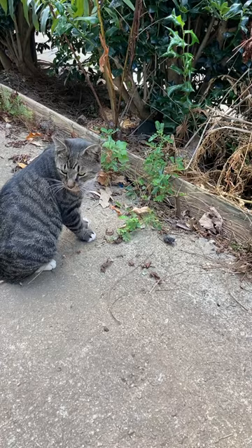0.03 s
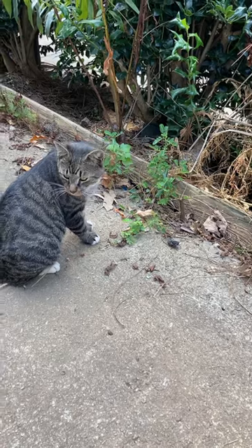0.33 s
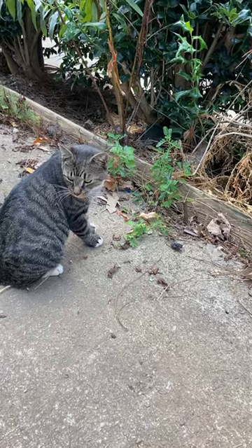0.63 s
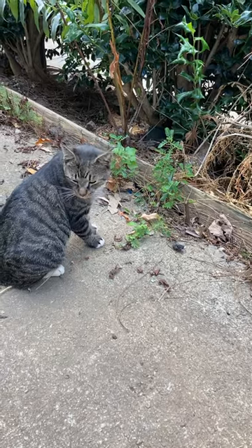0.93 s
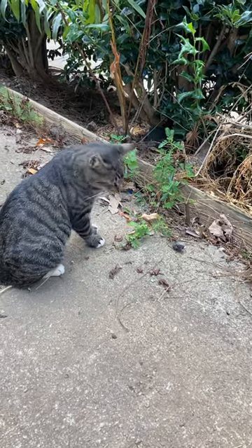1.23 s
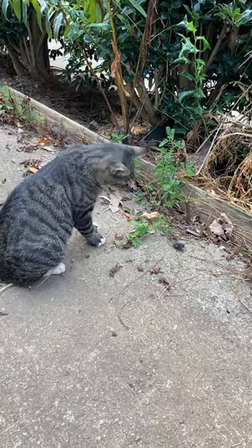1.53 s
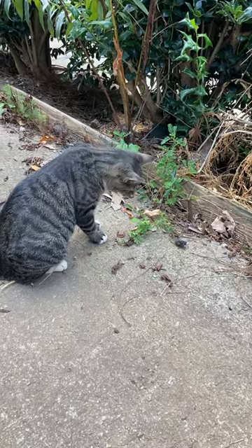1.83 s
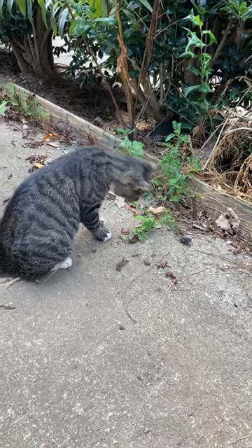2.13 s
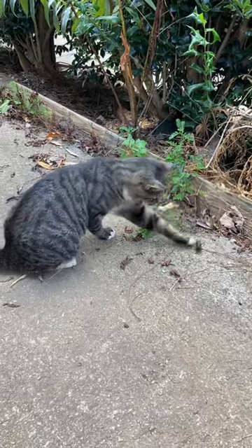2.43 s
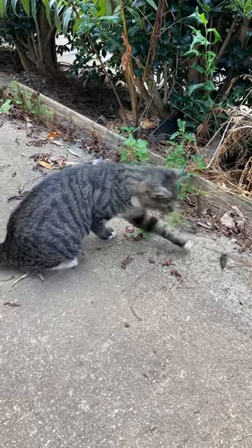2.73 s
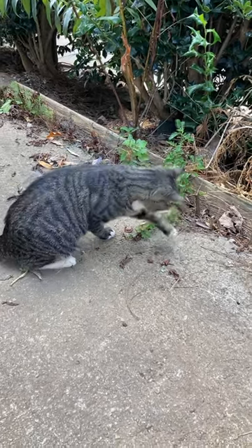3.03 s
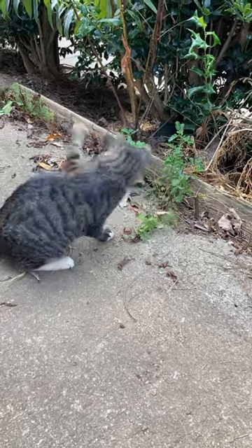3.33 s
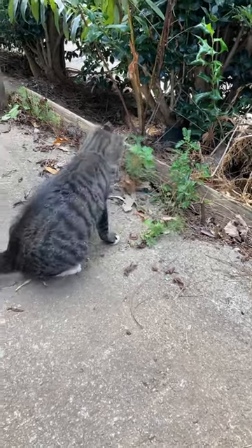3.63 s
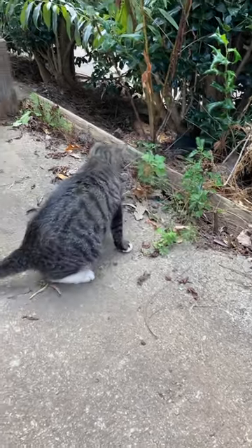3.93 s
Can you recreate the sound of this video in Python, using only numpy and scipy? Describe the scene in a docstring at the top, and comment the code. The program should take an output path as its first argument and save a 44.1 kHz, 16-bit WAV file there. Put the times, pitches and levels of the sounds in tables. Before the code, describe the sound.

Harsh, shrill cicada buzzing breaks out in bursts, with light scuffs and distant traffic rumble.

```python
"""Far traffic rumbles throughout, under faint insects; an engine drones and fades, a car swells by at 1.5 s.
From 2.2 s a cat paws at a cicada on a concrete path; from 2.35 s the cicada screeches in three bursts.
Its two tymbals take turns, three ribs buckling per stroke; the clicks ring its hollow abdomen and blur
as it tumbles. Garden walls add a short tail. Last chirps and scuffs come near 3.8 s.
Heard through two closely spaced microphone ports."""
import sys
import numpy as np
from scipy import signal
from scipy.fft import rfft, irfft
from scipy.io import wavfile
from scipy.ndimage import uniform_filter1d

SR = 44100
rng = np.random.default_rng(int(sys.argv[2]) if len(sys.argv) > 2 else 0)


def unload_audio(sound):
    """Save the sound as a 16-bit wav file, at the path given as the first command line argument."""
    columns = np.transpose(np.atleast_2d(sound))
    # keep every value between -1 and 1, then stretch to whole-number steps
    steps = np.round(np.clip(columns, -1, 1) * 32767)
    wavfile.write(sys.argv[1], SR, steps.astype(np.int16))


N = 176400
T = np.arange(N) / SR
HZ = np.maximum(np.arange(N // 2 + 1) * SR / N, 1)


# screech envelopes: t/s, level/dB
SCREECH_1 = [(2.346, -24.5), (2.4, -24), (2.445, -14.5), (2.5, -18), (2.56, -22), (2.615, -29.5),
             (2.632, -24), (2.652, -20), (2.79, -16.5), (2.815, -22), (2.9, -23), (2.972, -24.5)]
SCREECH_2 = [(3.056, -22.5), (3.068, -18.5), (3.085, -21.8), (3.165, -21), (3.205, -26), (3.248, -30)]
SCREECH_3 = [(3.332, -28.5), (3.362, -25.5), (3.42, -30), (3.47, -30), (3.55, -26.5), (3.585, -30.5),
             (3.615, -25.5), (3.672, -24.5)]
# single twitches: t/s, half length/s, level/dB
CHIRPS = [(2.332, 0.009, -46), (2.418, 0.0043, -19), (3.28, 0.0053, -31), (3.767, 0.0033, -32.5),
          (3.814, 0.0066, -45)]

def cicada(attack_s=0.0088, release_s=0.0093):
    """The body's buzz, levelled, then gated into abrupt screeches and chirps."""
    screeches = 0
    for rows in (SCREECH_1, SCREECH_2, SCREECH_3):
        attack = np.clip(1 + (T - rows[0][0]) / attack_s, 0, 1)
        release = np.exp(-np.maximum(T - rows[-1][0], 0) / release_s)
        screeches += attack * release * undb(curve(rows))
    chirp_power = sum(undb(db) ** 2 * np.exp(-((T - t) / half_s) ** 2) for t, half_s, db in CHIRPS)
    envelope = np.sqrt(screeches ** 2 + chirp_power)
    buzz = body()
    return envelope * buzz / np.sqrt(uniform_filter1d(buzz ** 2, size=600))


# body response: f/Hz, gain/dB
BODY_RESPONSE = [(1500, -61), (2600, -25.5), (3300, -10), (4000, -6.5), (4700, -1.5), (5700, -2.5),
                 (6700, -4.5), (7700, -8.5), (8500, -4), (9500, -6), (11500, -9), (13500, -9.5),
                 (15600, -18)]
# colour by posture: t/s, abdomen ring/dB, abdomen f/Hz, treble/dB, low buzz/dB, click blur/dB
POSTURE = [(2.35, -10, 6700, -0.5, -1.5, -8), (2.40, -1, 6400, -0.5, 1.5, -9),
           (2.445, 13.5, 5670, -4.5, 2.5, 0), (2.60, 9, 5250, 6, 6.5, 8.5),
           (2.655, -7, 5740, -1.5, -5, -14), (2.79, 7.5, 5700, -3, -9, -12),
           (2.86, -2, 5440, -2.5, -9.5, -10), (2.95, 8.5, 5270, -1, 3.5, -6),
           (3.07, 17.5, 5850, 3, -1.5, -9), (3.17, 14.5, 5330, 2.5, 5.5, -6), (3.35, 1.5, 5760, -1, -3, -2),
           (3.52, -3, 5700, 1.5, 1, -6), (3.66, -3, 5660, -3, -1, 1)]

def body(treble_hz=7600, low_hz=4900):
    """Tymbal clicks pass through the body, whose colour follows posture."""
    ring_db, ring_hz, treble_db, low_db, blur_db = (curve(POSTURE, i) for i in range(1, 6))
    buzz = filtered(tymbals(blur_db), minimum_phase(BODY_RESPONSE))
    treble = filtered(buzz, 1 / (1 + (treble_hz / HZ) ** 20))
    low = filtered(buzz, 1 / (1 + (HZ / low_hz) ** 20))
    buzz += (undb(treble_db) - 1) * treble + (undb(low_db) - 1) * low
    return buzz + undb(ring_db) * abdomen(buzz, ring_hz)


# rib buckling: t/s, rate/Hz
BUCKLE_RATE = [(2.48, 556), (2.76, 558), (2.88, 543), (2.97, 522), (3.16, 530), (3.45, 588)]
# ribs of one stroke: relative level/dB, ring f/Hz
RIBS = [(-3, 7100), (-3.5, 8140), (-5.5, 6200)]

def tymbals(blur_db, count=2400, jitter_s=0.0001, scatter_db=2.4, weak_side_db=-0.5,
            ring_db=6, width_hz=1040):
    """Two tymbals buckle in turn, rib by rib; each rib rings briefly and a rasp blurs the clicks."""
    jitter, scatter = rng.standard_normal((count, 2)).T
    k = np.arange(count)
    buckled = np.cumsum(curve(BUCKLE_RATE)) / SR
    times_s = np.interp(k, buckled, T) + jitter_s * jitter
    side = k // len(RIBS) % 2
    sizes = undb(scatter_db * scatter + weak_side_db * side) * (k < buckled[-1])
    strokes = 0
    for i, (db, hz) in enumerate(RIBS):
        rib = clicks(times_s[i::len(RIBS)], sizes[i::len(RIBS)])
        strokes += undb(db) * filtered(rib, 1 + undb(ring_db) * resonance(hz, width_hz))
    rasp = rng.standard_normal(N) * undb(0.83 * wander(463))
    return unit(strokes) + undb(blur_db) * unit(rasp)


def abdomen(x, ring_hz, width_hz=360):
    """The air cavity rings at a pitch that moves as the insect is squeezed and stretches."""
    pitch_hz = ring_hz * (1 + 0.025 * wander(25))
    carrier = np.exp(2j * np.pi * np.cumsum(pitch_hz) / SR)
    pole = np.exp(-np.pi * width_hz / SR)
    return 2 * np.real(carrier * signal.lfilter([1 - pole], [1, -pole], x / carrier))


# phase lead of the left port: f/Hz, phase/rad
PORT_PHASE = [(20, 0), (2300, 1.5), (3300, 1.5), (4000, 1.85), (4700, 2.45), (5400, 3.14), (6500, 4.2),
              (7400, 5.1), (8400, 6.28), (11700, 9.42), (15000, 12.5)]

def garden(x, ground_db=-5, diffuse_db=-13, walls_db=-22):
    """Sound reaches both ports directly, off the ground and off the garden walls."""
    near, diffuse = ground(x)
    direct_and_near = (x + undb(ground_db) * near) / np.hypot(1, undb(ground_db))
    half_lead = np.exp(0.5j * spectrum(PORT_PHASE))
    ports = filtered(direct_and_near, np.array([half_lead, 1 / half_lead]))
    return ports + undb(diffuse_db) * diffuse + undb(walls_db) * echoes(x, t60_s=0.16)


def ground(x, paths=4, tumble_hz=7):
    """Reflections off the concrete and its edging shift as the insect tumbles."""
    weights = np.array([wander(tumble_hz) for _ in range(paths)])
    weights /= np.sqrt(np.sum(weights ** 2, axis=0))
    return sum(echoes(x * weight, t60_s=0.025) for weight in weights)


# scrapes: t/s, half length/s, level/dB
SCUFFS = [(2.223, 0.0011, -52.5), (2.327, 0.036, -55), (3.025, 0.069, -42.5), (3.307, 0.011, -39),
          (3.713, 0.018, -42), (3.784, 0.057, -45)]

def scuffs():
    """Wings and paw scrape the concrete, thin and grainy."""
    envelope = sum(undb(db) * np.exp(-np.abs(T - t) / half_s) for t, half_s, db in SCUFFS)
    grains = rng.standard_normal((2, N)) * undb(2.1 * wander(700))
    return envelope * unit(filtered(grains, resonance(12700, width_hz=21000)))


# road noise spectrum: f/Hz, relative level/dB
ROAD_SPECTRUM = [(22, -47), (43, -9.5), (65, -4), (90, 0), (115, -1.5), (170, -12.5), (290, -14.5),
                 (420, -23.5), (1000, -23.5), (1600, -28.5), (2800, -46.5), (5500, -54.5), (9000, -57.5),
                 (15000, -87)]
# stereo width: f/Hz, side over mid/dB
ROAD_WIDTH = [(130, -29.5), (350, -16), (700, -6.5), (1500, 2)]
# road envelope: t/s, level/dB
ROAD_LEVEL = [(0, -36), (1.2, -35.5), (2.5, -36.5), (4, -37)]

def road():
    """Far rumble and tyre wash, alike on both sides in the bass."""
    colour_db = spectrum(ROAD_SPECTRUM)
    mid = filtered(rng.standard_normal(N), undb(colour_db))
    side = filtered(rng.standard_normal(N), undb(colour_db + spectrum(ROAD_WIDTH)))
    return unit(np.array([mid + side, mid - side])) * undb(curve(ROAD_LEVEL) + 0.5 * wander(14))


# engine harmonics: t/s, 2nd/dB, 3rd/dB, 12th/dB
ENGINE_HARMONICS = [(.3, -45, -38, -76), (.5, -36, -38, -83), (.8, -42, -41, -53.5), (1.2, -39, -41, -55.5),
                    (1.6, -42, -47.5, -89), (4, -54.5, -77, -87)]

def engine(fundamental_hz=44.58):
    """A far engine drones on three wavering harmonics and fades."""
    phase = 2 * np.pi * np.cumsum(fundamental_hz * (1 + 0.0042 * wander(6))) / SR
    drone = 0
    for column, harmonic in enumerate((2, 3, 12), start=1):
        level_db = curve(ENGINE_HARMONICS, column) + 0.5 * wander(2.9)
        drone += undb(level_db) * np.sqrt(2) * np.sin(harmonic * phase)
    return drone


def car(pass_s=1.53, half_s=0.2, peak_db=-47):
    """A far car passes; its low rush falls off with distance."""
    rush = unit(filtered(rng.standard_normal(N), resonance(238, width_hz=160) ** 2))
    return undb(peak_db) * rush / np.hypot(1, (T - pass_s) / half_s)


# insect bands: f/Hz, width/Hz, level/dB
INSECT_BANDS = [(3910, 1400, -66), (7200, 1400, -72.5), (10500, 9800, -82.5)]

def far_insects():
    """Insects in the bushes merge into a faint, shimmering hiss."""
    hiss = 0
    for hz, width_hz, db in INSECT_BANDS:
        shimmer = undb(db + wander(8.4))
        hiss += shimmer * unit(filtered(rng.standard_normal((2, N)), resonance(hz, width_hz) ** 2))
    return hiss


def undb(db):
    """Decibels to gain."""
    return 10 ** (np.asarray(db) / 20)


def curve(rows, column=1):
    """Table column interpolated over time."""
    rows = np.array(rows)
    return np.interp(T, rows[:, 0], rows[:, column])


def spectrum(rows):
    """Table interpolated over log frequency."""
    rows = np.array(rows)
    return np.interp(np.log(HZ), np.log(rows[:, 0]), rows[:, 1])


def unit(x):
    """Scale to rms 1."""
    return x / np.sqrt(np.mean(x ** 2))


def filtered(x, response):
    """Apply a frequency response."""
    return irfft(rfft(x) * response, N)


def resonance(hz, width_hz):
    """Band-pass response, gain 1 at its centre."""
    return 1 / (1 + 1j * (HZ ** 2 - hz ** 2) / (HZ * width_hz))


def minimum_phase(rows):
    """Causal response from a gain table."""
    cepstrum = irfft(np.log(undb(spectrum(rows))), N)
    return np.exp(rfft(2 * cepstrum * (np.arange(N) < N // 2)))


def wander(rate_hz):
    """Smooth random drift, rms 1."""
    return unit(filtered(rng.standard_normal(N), np.exp(-(HZ / rate_hz) ** 2)))


def echoes(x, t60_s):
    """Two independent tails of dense, decaying reflections."""
    tail = rng.standard_normal((2, N // 4)) * np.exp(-np.log(1000) * T[:N // 4] / t60_s)
    tail /= np.sqrt(np.sum(tail ** 2, axis=1, keepdims=True))
    return signal.fftconvolve(x[None], tail, axes=1)[:, :N]


def clicks(times_s, sizes, half_taps=8):
    """Windowed-sinc impulses placed between samples."""
    centres = times_s[:, None] * SR
    taps = np.floor(centres).astype(int) + np.arange(1 - half_taps, half_taps + 1)
    pulses = sizes[:, None] * np.sinc(taps - centres) * np.sinc((taps - centres) / half_taps)
    return np.bincount(taps.ravel() % N, pulses.ravel(), N)


def scene():
    """Cicada and scuffle over far traffic and insects."""
    return garden(cicada()) + scuffs() + road() + engine() + car() + far_insects()


def record(dry):
    """Steep low-pass at 15.9 kHz."""
    return signal.sosfilt(signal.ellip(10, 0.2, 80, 15900, fs=SR, output="sos"), dry)


dry = scene()
out = record(dry)
unload_audio(out)
```